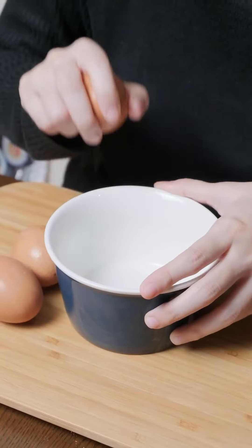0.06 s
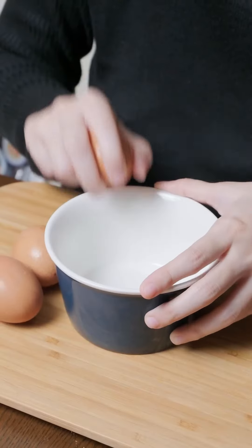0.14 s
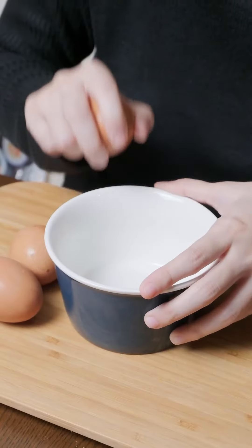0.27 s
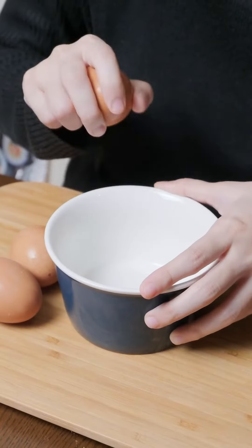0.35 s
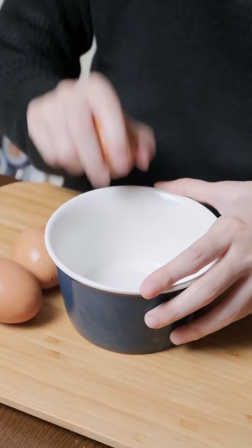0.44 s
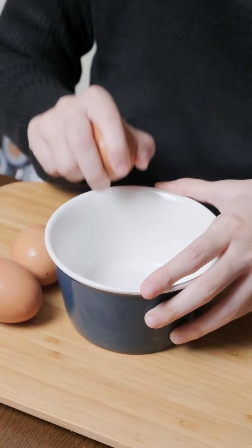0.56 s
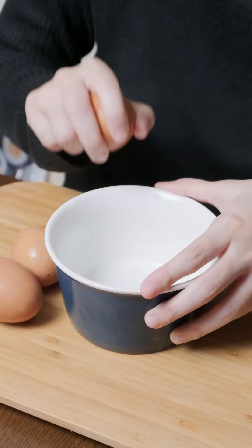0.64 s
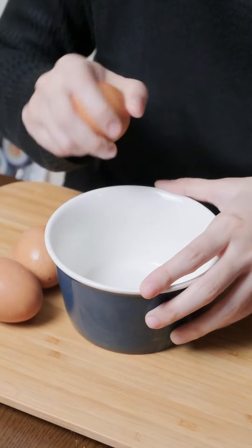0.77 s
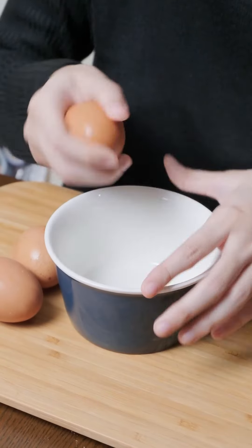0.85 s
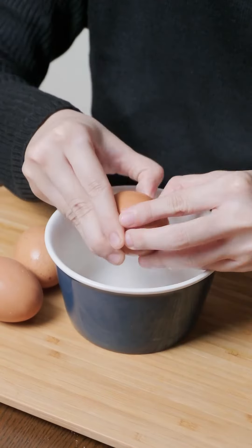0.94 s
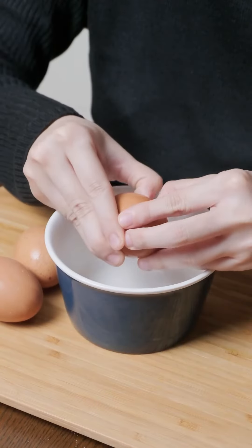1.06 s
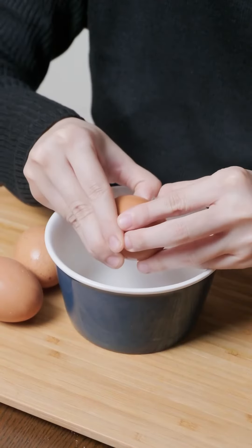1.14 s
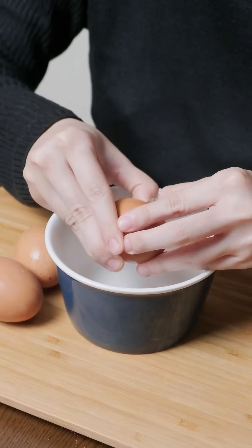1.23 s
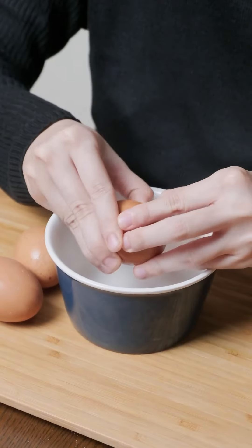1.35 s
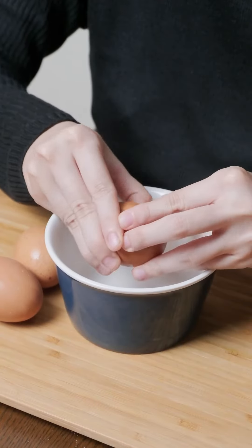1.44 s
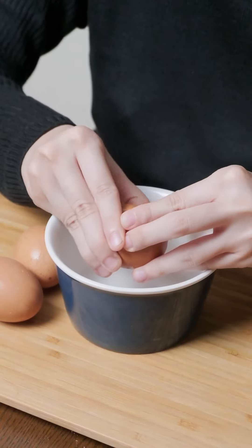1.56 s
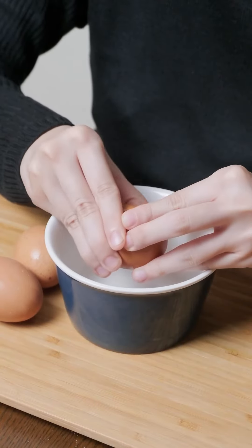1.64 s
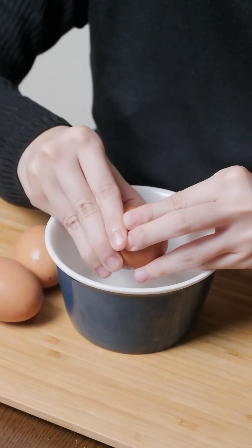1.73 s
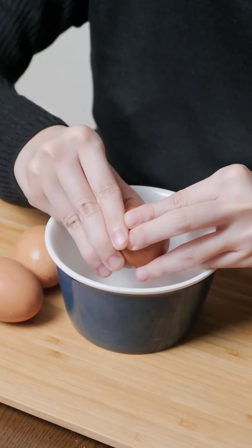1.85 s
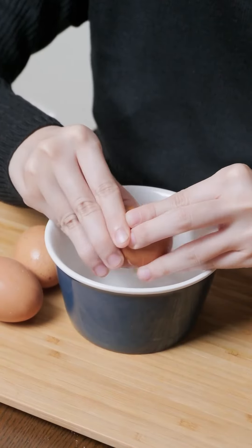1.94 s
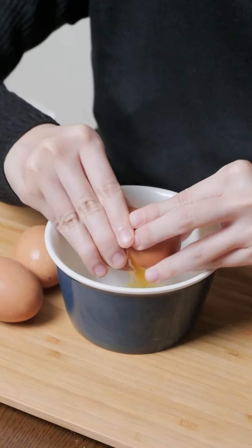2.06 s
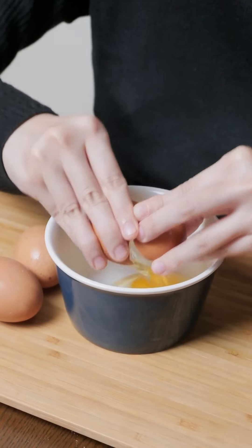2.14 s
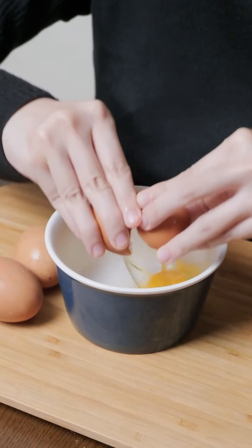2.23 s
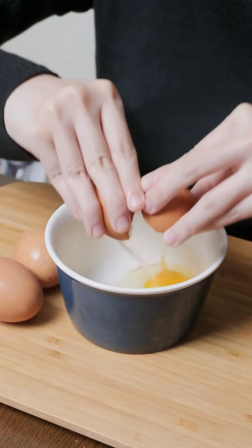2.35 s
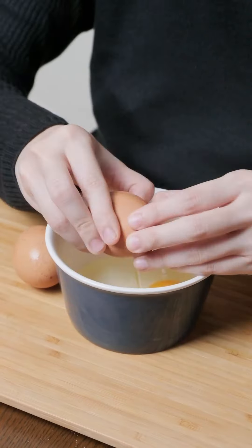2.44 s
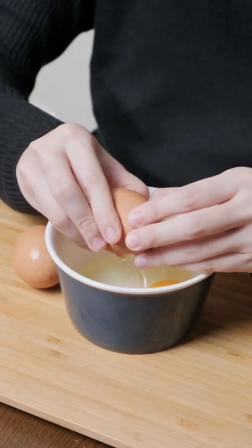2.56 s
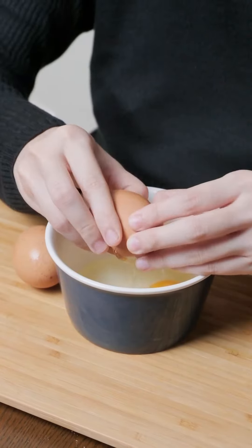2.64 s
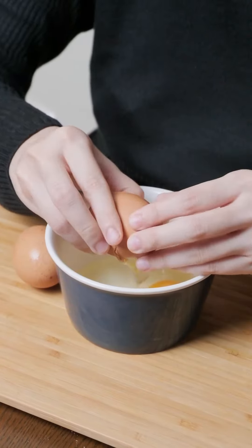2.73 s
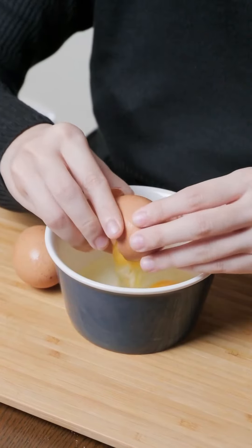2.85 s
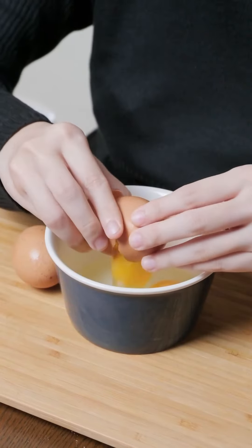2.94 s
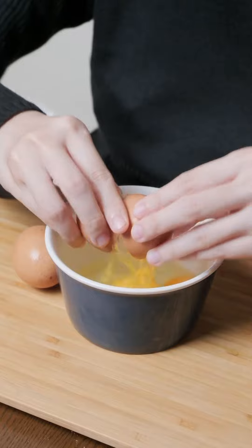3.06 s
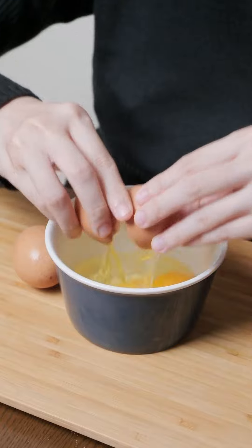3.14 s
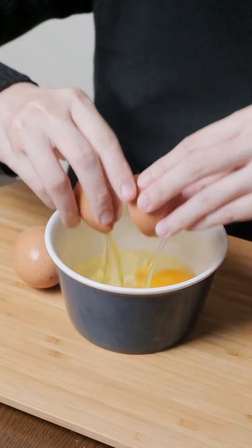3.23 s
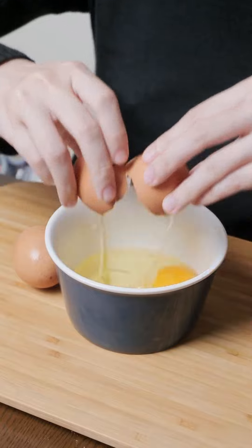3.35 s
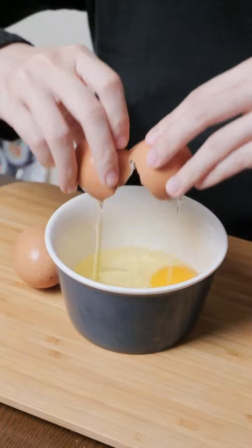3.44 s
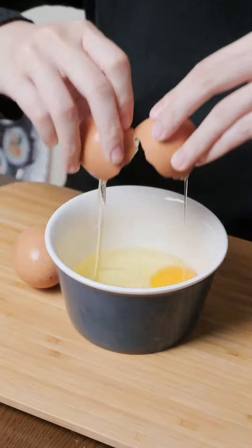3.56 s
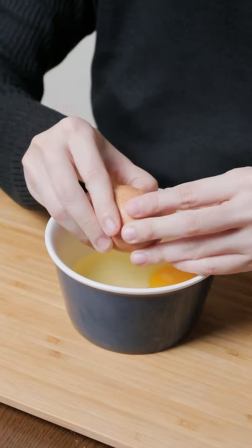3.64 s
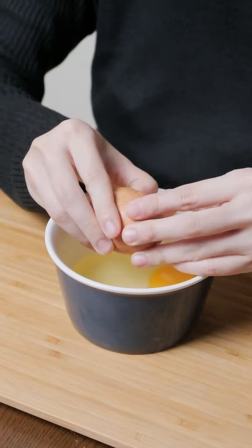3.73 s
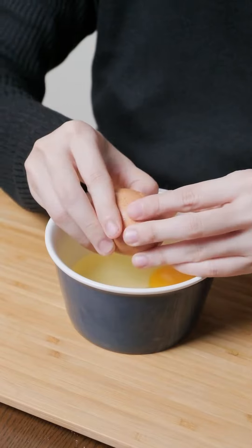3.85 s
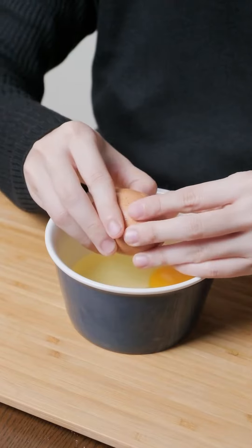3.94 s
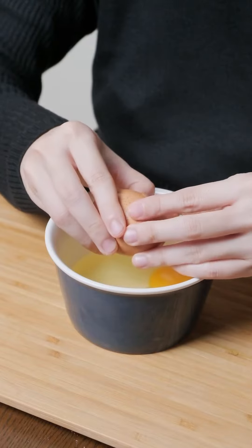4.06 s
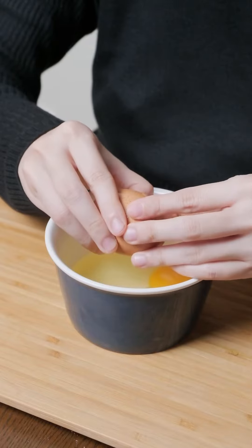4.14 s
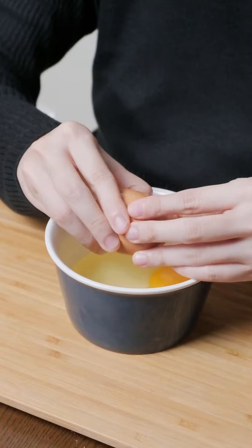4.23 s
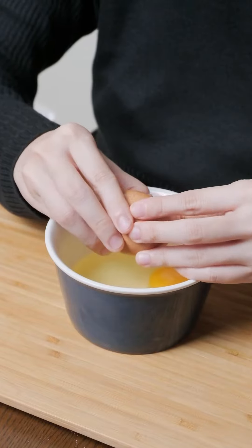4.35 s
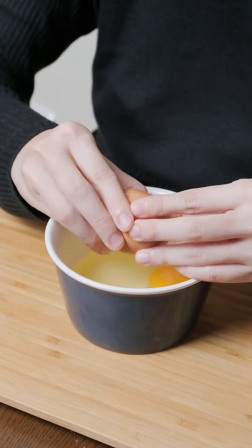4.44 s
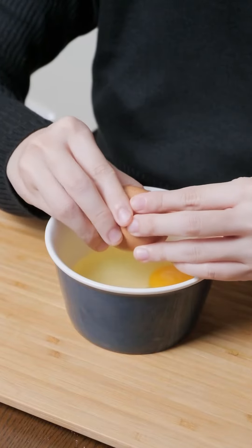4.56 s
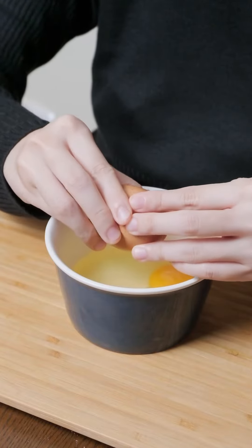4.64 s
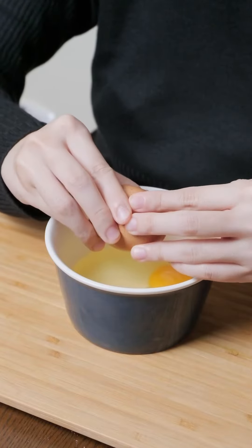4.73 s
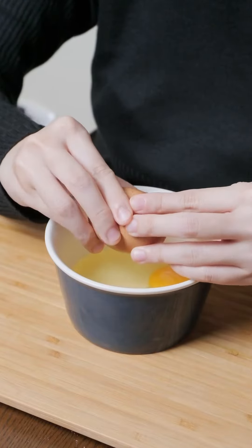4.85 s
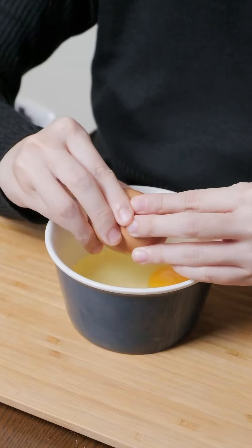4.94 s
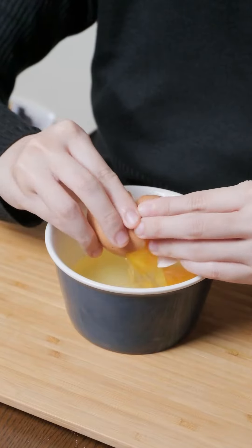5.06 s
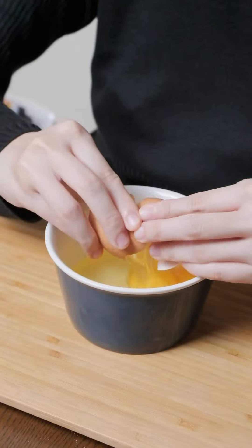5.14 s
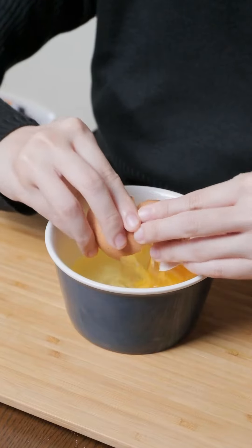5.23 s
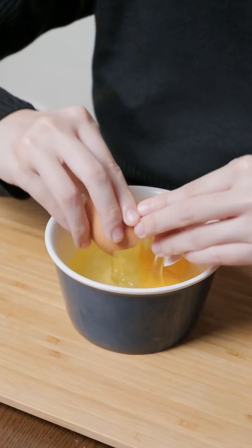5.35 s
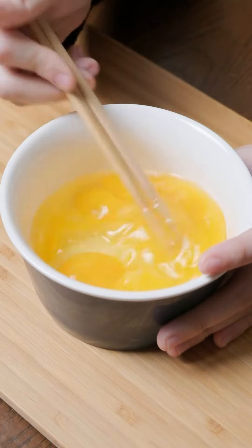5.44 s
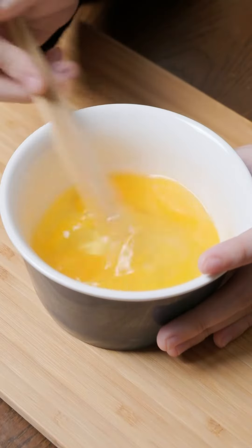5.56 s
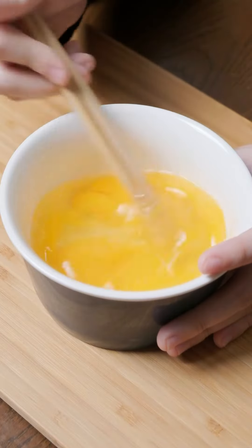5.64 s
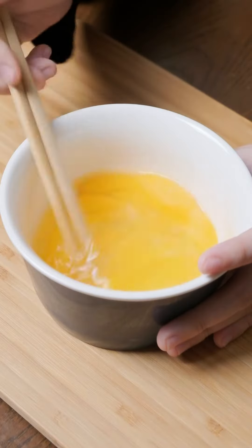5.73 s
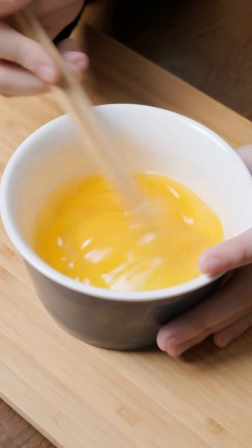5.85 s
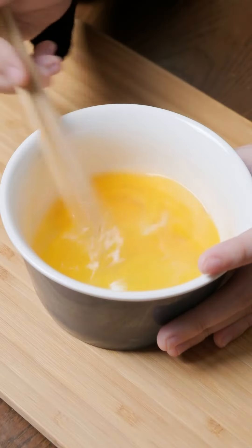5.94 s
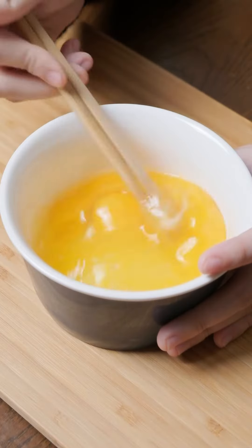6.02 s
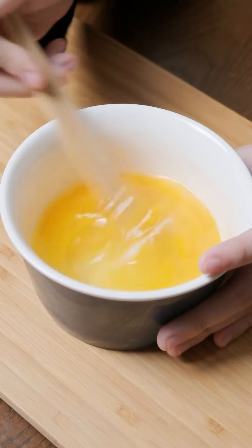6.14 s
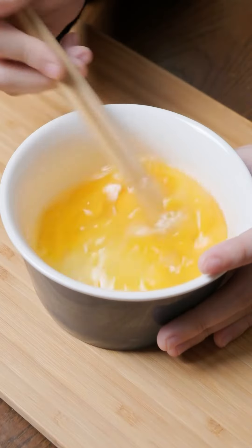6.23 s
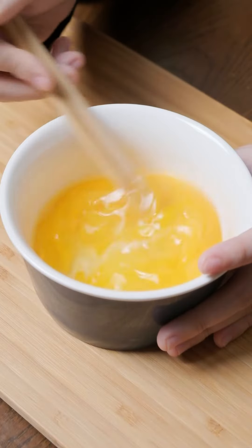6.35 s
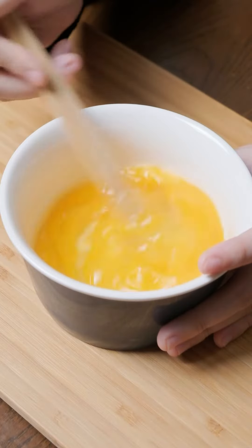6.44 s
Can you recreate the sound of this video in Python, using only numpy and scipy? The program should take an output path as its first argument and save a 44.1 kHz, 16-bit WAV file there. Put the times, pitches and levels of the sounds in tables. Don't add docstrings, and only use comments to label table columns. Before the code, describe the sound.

Close, dry cracking of eggs over a hollow bowl in a small humming kitchen, ending with wooden sticks clacking and sloshing beaten egg.

```python
import sys
import numpy as np
from scipy import signal
from scipy.io import wavfile
from scipy.ndimage import uniform_filter1d

SR = 44100
rng = np.random.default_rng(int(sys.argv[2]) if len(sys.argv) > 2 else 0)


def invert_db(level):
    return 10 ** (np.asarray(level, dtype=float) / 20)


def transcribe(signal):
    frames = np.atleast_2d(signal).T
    limited = np.clip(frames, -1, 1)
    pcm = np.round(limited * 32767).astype(np.int16)
    wavfile.write(sys.argv[1], SR, pcm)


N = 286209
T = np.arange(12000) / SR


def read(points, hz):
    f, value = np.transpose(points)
    return np.interp(np.log(hz + 1), np.log(f + 1), value)


def add(mix, s, sound):
    part = mix[round(s * SR):][:len(sound)]
    part += sound[:len(part)]


def peaked(x):
    return x / (abs(x).max() + 1e-20)


def band(x, lo_hz, hi_hz):
    sos = signal.butter(2, [lo_hz, min(hi_hz, SR / 2.1)], "band", fs=SR, output="sos")
    return signal.sosfilt(sos, x)


def ring(modes, luck=None, spread_db=0., detune=0.031):
    hz, db, t60 = np.transpose(modes)[:, :, None]
    luck = np.zeros(len(modes)) if luck is None else luck[:len(modes)]
    level = invert_db(db + spread_db * luck[:, None] - 60 * T / t60)
    hz = hz * (1 + detune * luck[::-1, None])
    return (level * np.sin(2 * np.pi * hz * T)).sum(0)


def tearing(noise, decay_ms):
    ms = np.arange(len(noise)) * 1000 / SR
    return noise * abs(noise) * (1 - np.exp(-ms / 0.73)) * np.exp(-ms / decay_ms)


def drifting(shape, patchy_db):
    hz = np.fft.rfftfreq(2048, 1 / SR)
    a, b, patches = rng.standard_normal((N // 512 + 5, len(hz), 3)).T
    patches = uniform_filter1d(uniform_filter1d(patches, size=9, axis=0), size=7, axis=1)
    level_db = read(shape, hz)[:, None] + patchy_db * patches / patches.std()
    noise = signal.istft((a + 1j * b) * invert_db(level_db), nperseg=2048, noverlap=1536)[1][:N]
    return noise / noise.std()


# (frequency [Hz], density [dB per Hz])
HUM = [(160, -36.5), (270, -11), (323, -12), (387, -3), (409, -27), (430, -8), (494, -10), (606, 1),
       (674, -9.5), (854, -8.5), (934, -11.5), (1020, -6), (1900, -25), (2470, -67), (4180, -120)]
# (frequency [Hz], density [dB per Hz])
HISS = [(820, -36.5), (1400, -15), (1490, -16.5), (1880, -6.5), (2020, -8), (2390, -6.5), (2490, -5),
        (2840, -11.5), (3490, -10.5), (4020, -10), (4600, -11.5), (5350, -9), (5700, -3), (6190, -14),
        (14100, -14), (15800, -14.5), (16050, -41)]
# (frequency [Hz], density [dB per Hz])
RUMBLE = [(8.8, -34.5), (15, -1), (19, 4.5), (30, -3.5), (45, -1), (91, -2), (136, -13.5), (151, -7),
          (183, -2), (270, -9), (350, -34), (590, -120)]
# (time [s], level [dB])
BACKGROUND_LEVEL = [
    (0, 16),
    (.12, 9.5),
    (.7, 11.5),
    (1.5, 3.5),
    (2.45, 6.5),
    (2.55, 2.5),
    (3.5, 1.5),
    (4.5, 3.5),
    (6.49, 0.5),
]


def room_tone():
    t = np.arange(N) / SR
    background_db = np.interp(t, *np.transpose(BACKGROUND_LEVEL))
    drop_db = -0.7 * (t > 5.9)
    hum = invert_db(-59.5 + .22 * background_db + drop_db) * drifting(HUM, 1.1)
    hiss = invert_db(-65.5 + drop_db) * drifting(HISS, 1.4)
    rumble = invert_db(-63.5 + background_db) * drifting(RUMBLE, 1.5)
    return hum + hiss + rumble


def board(s, db, t60, lo_hz, hi_hz):
    t, out = np.arange(SR // 2) / SR, np.zeros(N)
    grain = peaked(band(band(rng.standard_normal(len(t)), lo_hz, hi_hz), lo_hz, hi_hz))
    add(out, s, invert_db(db - 60 * t / t60) * (1 - np.exp(-t / 0.0013)) * grain)
    return out


def knock(contacts, modes):
    out, body = np.zeros(N), ring(modes)
    for s, db, contact_ms, crack_db in contacts:
        u = T[:90] * 1000 / contact_ms
        add(out, s, invert_db(db) * peaked(signal.fftconvolve(body, u * np.exp(-u))))
        drive = tearing(rng.standard_normal(400), 0.76)
        crack = band(band(drive, 3200, 6200), 3200, 6200)
        crack = crack + invert_db(-15) * band(drive, 7500, 16000)
        add(out, s, invert_db(crack_db) * peaked(crack))
    for lo_hz in (120, 110, 100):
        out = band(out, lo_hz, 19000)
    return out


# (frequency [Hz], level [dB], t60 [s])
DULL_MODES = [(194, -19.5, 0.24), (420, -3.5, 0.024), (540, -7.5, 0.014), (735, -3.5, 0.054),
              (760, -24, 0.17), (1007, 0.5, 0.025), (1680, 2, .014), (1580, -12, 0.16), (2250, 2.5, 0.011),
              (2680, -20, .3), (3670, -13.5, 0.017), (3750, -19.5, .2), (4700, -8, 0.13), (5630, -7, 0.13)]


def dull_knock():
    contact_ms, crack_db = .16, -22.5
    contacts = [(.1896, -1, contact_ms, crack_db + 6.5)]
    for k in range(3):
        contacts.append((.1917 + k * .0014, 6 - 6 * (k == 0), contact_ms, crack_db))
    wood = board(.2, -12.5, 0.3, 420, 1700) + board(0.19, -13, 0.14, 310, 420)
    wood += board(0.18, -23.5, 0.75, 810, 1800) + board(0.17, -40, .5, 2000, 6300)
    return knock(contacts, DULL_MODES) + wood


# (time [s], peak level [dB], contact [ms], crack level [dB])
SHARP_CONTACTS = [
    (.4700, -27.5, 0.039, -43.5),
    (.4928, 3.5, 0.03, 1.5),
    (.4936, 3.5, 0.039, 2),
    (.4948, -0.5, 0.13, -7),
    (.4968, -2, 0.034, -8),
    (.4988, -8, 0.053, -8.5),
    (.7766, -28, 0.083, -46),
]
# (frequency [Hz], level [dB], t60 [s])
SHARP_MODES = [(133.6, -15.5, 0.34), (544, -6.5, 0.03), (1000, -6, 0.02), (1057, -6.5, 0.093),
               (1280, 3, 0.014), (1520, -10.5, 0.028), (2270, 14.5, 0.0046), (3400, 1.5, 0.005),
               (3810, -23, 0.22), (4300, 3, 0.008), (4930, 0.5, 0.0065), (5500, -0.5, 0.011),
               (5470, -12, .14)]


def sharp_knock():
    wood = board(.4925, -13.5, 0.18, 1300, 1700) + board(.4925, -20, 0.59, 800, 1330)
    wood += board(.4925, -32.5, 0.54, 1800, 6500)
    return knock(SHARP_CONTACTS, SHARP_MODES) + wood


# (frequency [Hz], t60 [s])
KITCHEN_DECAY = [(150, 0.18), (500, 0.4), (1100, 0.21), (2700, .26), (6000, 0.3), (12000, 0.093)]
# (frequency [Hz], level [dB])
WALL_COLOUR = [(150, 2.5), (1000, 7), (2000, 1.5), (4000, -2), (5700, 1), (7200, -1), (15000, 6.5)]


def kitchen(x):
    turn, out = np.arange(N) / SR * 2.3, np.zeros(N)
    for k in range(3):
        taps = np.zeros(SR // 2)
        at = np.arange(90, len(taps) - 12, 12)
        taps[at + rng.integers(0, 12, len(at))] = rng.choice([-1., 1.], len(at))
        hz, t, z = signal.stft(taps, SR, nperseg=256)
        level_db = read(WALL_COLOUR, hz)[:, None] - 60 * t / read(KITCHEN_DECAY, hz)[:, None]
        tail = signal.istft(z * invert_db(level_db), SR, nperseg=256)[1]
        feed = np.sqrt(2 / 3) * np.cos(np.pi * (turn + k / 3))
        out += signal.oaconvolve(x * feed, tail / np.linalg.norm(tail))[:N]
    return out


# (time [s], peak level [dB], piece frequency [Hz], piece level [dB], bowl air level [dB])
SPLITS = [(.9801, -41, 2300, -22, -26), (.9896, -17.5, 2800, -16, -8), (1.0599, -17.5, 3000, -13, -2.5),
          (1.0634, -14.5, 2990, -21, -13.5), (1.704, -32, 2007, -15.5, -17), (1.8826, -34, 2180, -5.5, -5),
          (1.9259, -40, 2270, -5, 3.5), (1.942, -17, 3070, -16, -27), (2.0632, -26.5, 1660, -3, -43),
          (2.1202, -37.5, 2000, -8, -29.5), (2.4254, -35, 1970, -31, -1.5), (2.5133, -19, 2520, -13, -0.5),
          (2.804, -17, 1610, -11, -12.5), (2.8157, -21, 1650, 1, -34), (2.8236, -23, 1700, -2, -30),
          (2.8307, -19, 1760, 0.5, -16), (2.8792, -38.5, 1710, -1, -12.5), (4.2068, -38, 2270, -6, 3),
          (4.2527, -19, 2060, -7.5, -5), (4.9474, -42, 2130, -16, -1), (4.9681, -26, 3170, -37, -9),
          (4.9986, -13, 2670, -10, -17.5), (5.1085, -42, 2370, -6, -6), (2.8335, -19, 2310, -5.5, -3.5)]
# (time [s], peak level [dB], piece frequency [Hz], bowl air level [dB])
PRIES = [(.9712, -41, 2370, -29), (1.3673, -31, 2710, -31), (1.7114, -33, 3320, -10),
         (1.733, -34, 2680, -5.5), (1.9126, -34.5, 2700, -29), (1.9703, -44.5, 2700, 11),
         (1.9884, -38, 2700, -19), (2.4573, -40, 1890, -5), (2.4867, -36, 2650, -30),
         (2.5184, -17.5, 2530, -12), (2.5222, -13, 2540, -45), (3.04, -29.5, 2470, -8),
         (3.0889, -30, 1870, -8), (3.6885, -40, 2430, -13), (3.8247, -39.5, 2600, -17),
         (3.8846, -41.5, 2620, -22), (4.1869, -39, 1550, 2), (4.2627, -17, 2930, -9),
         (4.7172, -39.5, 2540, -6.5), (4.9836, -29, 2270, -1), (4.9914, -29, 2520, -8),
         (5.0374, -26, 2970, -15), (5.0843, -28, 2620, -21)]
# (time [s], peak level [dB], ringing
# frequency [Hz], ringing level [dB])
FLAKES = [(5.7385, -55, 2440, 21.5), (1.1754, -47.5, 2270, -0.5), (1.499, -46, 2200, -3),
          (1.9624, -28.5, 1860, 2.5), (1.9739, -15.5, 2740, 2.5), (2.0014, -44, 2700, 14),
          (2.0413, -34.5, 2110, 9), (2.1804, -54, 1668, 5), (2.4094, -51, 1870, 6.5),
          (2.5054, -29, 2400, -4), (2.5765, -35.5, 1810, -1.5), (2.6653, -44, 1610, -7.5),
          (2.7965, -31, 2456, -4.5), (2.9946, -35.5, 1560, -4.5), (5.0045, -15, 2350, -2),
          (5.0144, -31.5, 2740, 12), (5.0664, -42, 2770, 4), (5.1228, -40, 1730, 3),
          (5.1354, -43, 1910, 4.5), (5.1684, -49, 1710, -1), (5.1776, -44.5, 1800, 1.5),
          (5.3254, -46, 2040, -0.5), (5.4824, -53, 1500, 11)]
# (time [s], peak level [dB])
TICKS = [(1.1834, -43), (1.2027, -46.5), (2.1064, -42), (1.3149, -45.5), (1.4296, -43.5), (1.5264, -47.5),
         (1.6018, -45.5), (1.7973, -46), (1.8592, -47), (2.3211, -43.5), (2.4774, -42), (2.7164, -56.5),
         (3.6461, -42), (3.6564, -50), (3.6735, -41.5), (3.7813, -47.5), (3.8364, -42.5), (3.8974, -45),
         (3.921, -44.5), (4.6414, -48), (4.7444, -54), (4.9402, -53), (4.9628, -42)]


def fractures():
    splits = [(*row, -4.5) for row in SPLITS]
    pries = [(s, db, hz, -9, air_db, -19.5) for s, db, hz, air_db in PRIES]
    flakes = [(*row, -20, -17) for row in FLAKES]
    ticks = [(*row, 2480, -13.5, -18, -11.5) for row in TICKS]
    return splits + pries + flakes + ticks


# (frequency [Hz], level [dB], t60 [s])
SHELL = [(3300, -6, .005), (3750, -3, .006), (4400, -4, .005), (4900, -2, .005), (5500, 0, .008),
         (6000, -1, .006), (6500, -5, .005)]
# (frequency [Hz], level [dB], t60 [s])
BOWL_AIR = [(325, 4, 0.017), (524, 5, 0.012), (676, 13.5, 0.014), (904, 14, 0.023), (957, 18.5, 0.027)]


def snaps():
    out = np.zeros(N)
    for s, db, piece_hz, piece_db, air_db, fizz_db in fractures():
        luck = rng.standard_normal(420)
        drive = np.append(tearing(luck[20:], 1.9), np.zeros(1500))

        def driven(body):
            return signal.fftconvolve(drive, body)[:len(drive)]

        shell = peaked(band(driven(ring(SHELL, luck, 4.2)), 2680, 14000))
        bare = peaked(band(drive, 2900, 7400))
        shell = peaked(shell + 0.12 * bare)
        t60 = .009 + .016 / (1 + invert_db(-3 * piece_db - 9))
        piece = ring([(piece_hz, 0, t60), (piece_hz * 1.09, -3, t60 * .7), (piece_hz * 1.25, -5, .006)])
        piece = peaked(band(driven(piece), piece_hz / 1.2, piece_hz * 1.35))
        air = peaked(band(driven(ring(BOWL_AIR, luck[8:], 2.5)), 270, 1700))
        fizz = peaked(band(drive, 7500, 16500))
        snap = shell + invert_db(piece_db + 1.0) * piece + invert_db(air_db - 2.0) * air + invert_db(fizz_db + 2.5) * fizz
        add(out, s, invert_db(db) * snap)
    return out


# (start time [s], peak time [s], end time [s], peak level [dB], low part level [dB])
CRUNCHES = [
    (1.95, 1.965, 2.03, -39, -12.5),
    (2.425, 2.413, 2.45, -35.5, -6.5),
    (2.504, 2.514, 2.54, -35.5, 0.5),
    (4.978, 5.003, 5.04, -21, -28),
    (5.316, 5.316, 5.335, -54.5, -11),
    (5.416, 5.432, 5.49, -52, 1),
]


def crunches():
    t, level = np.arange(N) / SR, np.zeros((2, N))
    for *s, db, low_db in CRUNCHES:
        run_db = np.interp(t, s, [db - 16, db, db - 22.5])
        inside = (t > s[0]) & (t < s[-1])
        level += inside * invert_db([run_db, run_db + low_db])
    size_db = 3.3 * np.minimum(rng.exponential(1, N), 2.4)
    happens = rng.random(N) < 5000 / SR
    clicks = rng.standard_normal(N) * invert_db(size_db) * happens
    high = signal.oaconvolve(clicks, peaked(ring(SHELL)))[:N] + 1.8 * band(clicks, 2900, 10000)
    pieces = ring([(920, 1, 0.06), (1650, 13.2, 0.11), (2300, 9, 0.045), (2700, 30.0, 0.0043)])
    low = signal.oaconvolve(clicks, pieces)[:N]
    out = invert_db(-1) * (level[0] * high / high.std() + level[1] * low / low.std())
    return band(out, 600, 21000)


# (time [s], peak level [dB], wall frequency [Hz], wall level [dB], rim level [dB])
STROKES = [(5.5464, -49, 1325, -21, -25), (5.5505, -32, 1270, -19, -31), (5.5725, -12, 1126, -12, -6.5),
           (5.7375, -31, 1250, -14, -7), (5.764, -36.5, 1430, 3, 2), (5.7772, -18.5, 1324, -4, -10),
           (5.9688, -21.5, 1249, -4, -5.5), (6.0722, -39.5, 1540, -9.5, -13),
           (6.1476, -14.5, 1326, -7.5, -7), (6.235, -41.5, 1290, -9, -32), (6.313, -52.5, 1182, 3, -7),
           (6.3351, -15, 1276, -17, -6.5), (6.3636, -44, 1280, -17, -6), (6.4122, -51.5, 1496, 10, -11)]
# (frequency [Hz], level [dB], t60 [s])
STICKS = [(3100, -4, .004), (3800, -4, .004), (4500, -3, .004), (5100, 0, .004), (5700, 0, .004),
          (6300, -2, .004), (7300, -10, .004), (8400, -14, .004)]
# (frequency [Hz], level [dB], t60 [s])
CERAMIC = [(3700, -25.5, 0.085), (3930, -22, 0.11), (4500, -28, 0.063), (5940, -17, 0.038),
           (6180, -23, .05), (6300, -41, 0.14), (6760, -37.5, .07)]
# (frequency [Hz], level [dB], t60 [s])
THUMP = [(144, -0.5, 0.22), (205, 7.5, 0.11), (285, 12, 0.034), (558, 14.5, 0.056), (750, 14, 0.057)]


def strokes():
    out = np.zeros(N)
    for s, db, wall_hz, wall_db, rim_db in STROKES:
        luck = rng.standard_normal(220)
        drive = tearing(luck[20:], 2.1)
        push = tearing(np.ones(40), .12)

        def struck(blow, body, lo_hz, hi_hz):
            return peaked(band(signal.fftconvolve(blow, body)[:len(T)], lo_hz, hi_hz))

        bright = ring(STICKS, luck, 1.5, .03) + ring(CERAMIC, luck[8:], 3., .002)
        wall = ring([(wall_hz, 0, .09), (wall_hz * 1.05, -4, .04), (1525, -10, .13), (wall_hz * 0.9, -14, .05)])
        rim = ring([(2356, -1.5, 0.03), (2435, -3, 0.015)])
        blow = struck(drive, bright, 2800, 14000)
        blow = blow + invert_db(wall_db) * struck(push, wall, 850, 2200)
        blow += invert_db(rim_db) * struck(push, rim, 1700, 3300)
        blow += invert_db(-20) * struck(push, ring(THUMP, luck[10:], 0.52), 110, 1000)
        add(out, s, invert_db(db) * blow)
        add(out, s, invert_db(db - 11) * peaked(band(drive, 4300, 13000)))
        slosh = peaked(band(rng.standard_normal(len(T)), 1500, 7200))
        add(out, s, invert_db(db - 22 - 60 * T / 0.21) * (1 - np.exp(-T / 0.0037)) * slosh)
    slap = invert_db(-23) * out
    add(out, .0125, slap)
    return out


def scene():
    background = room_tone()
    dull, sharp = dull_knock(), sharp_knock()
    shells = snaps() + crunches()
    sticks = strokes()
    echoes = kitchen(invert_db(-13.5) * dull + invert_db(-15.5) * sharp + invert_db(-10.0) * shells + invert_db(-12.0) * sticks)
    return np.tile(background + dull + sharp + shells + sticks + echoes, (2, 1))


# (frequency [Hz], density [dB per Hz])
SELF_NOISE = [(12, -46), (20, -4.5), (270, -8.5), (527, -12.5), (607, -11), (976, -16.5), (9670, -14.5),
              (16000, -16)]


def self_noise():
    side = invert_db(-67.5) * drifting(SELF_NOISE, .7)
    return np.array([side, -side])


def limiter(level_from):
    power_db = 10 * np.log10(signal.lfilter([.006], [1, -.994], level_from ** 2) + 1e-12)
    fall = np.arange(N) * 42. / SR
    held_db = np.maximum.accumulate(power_db + fall) - fall
    over_db = np.maximum(held_db + 19, 0)
    late = np.exp(-1000 / SR / 3.)
    return invert_db(-.6 * signal.lfilter([1 - late], [1, -late], np.roll(over_db, 220)))


def low_pass(x):
    return signal.sosfilt(signal.butter(12, 16370, fs=SR, output="sos"), x)


def record(dry):
    mix = limiter(dry[0]) * (dry + self_noise())
    return low_pass(np.clip(mix, -1.06, 1.06))


dry = scene()
out = record(dry)
transcribe(out)
```